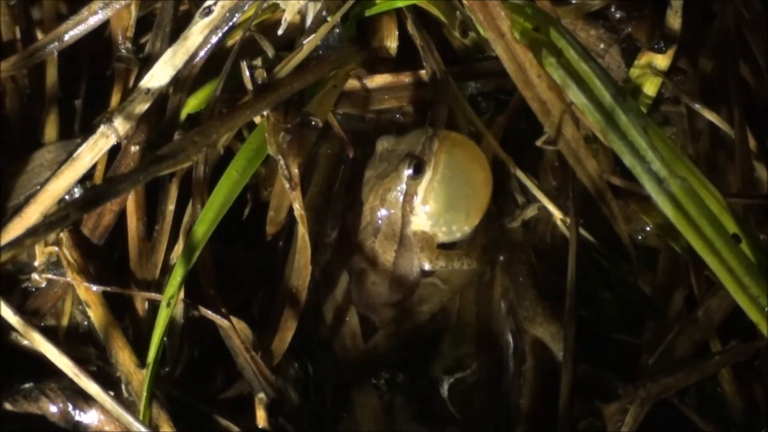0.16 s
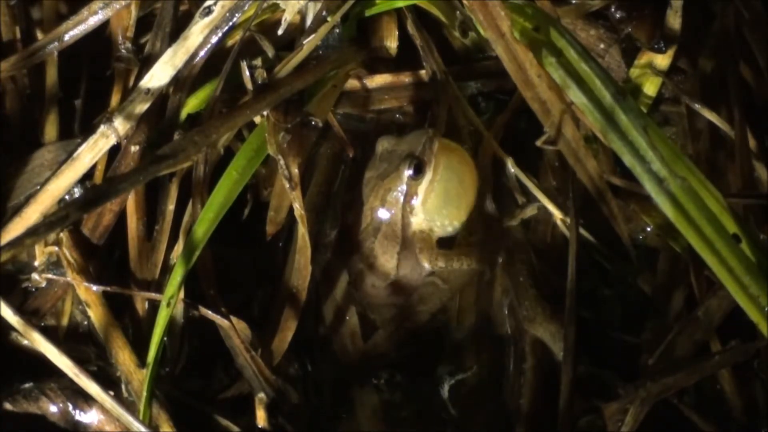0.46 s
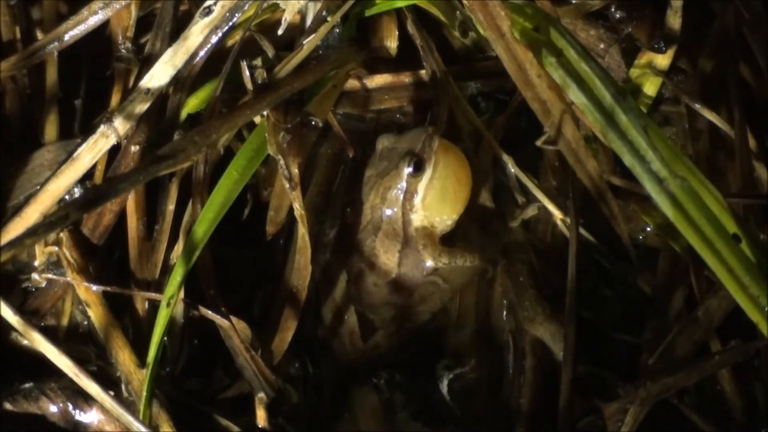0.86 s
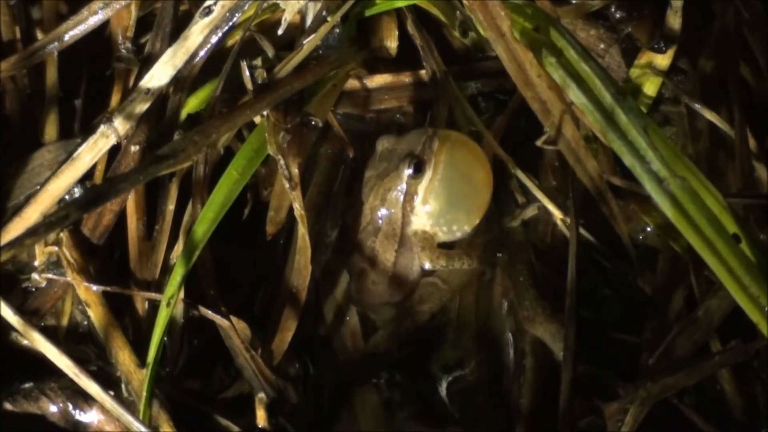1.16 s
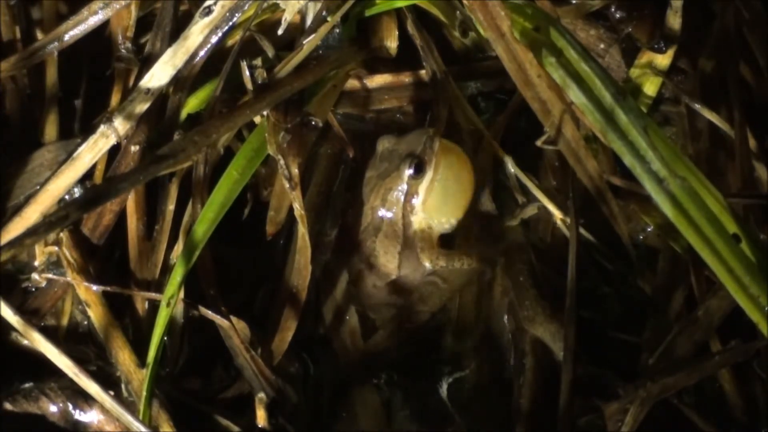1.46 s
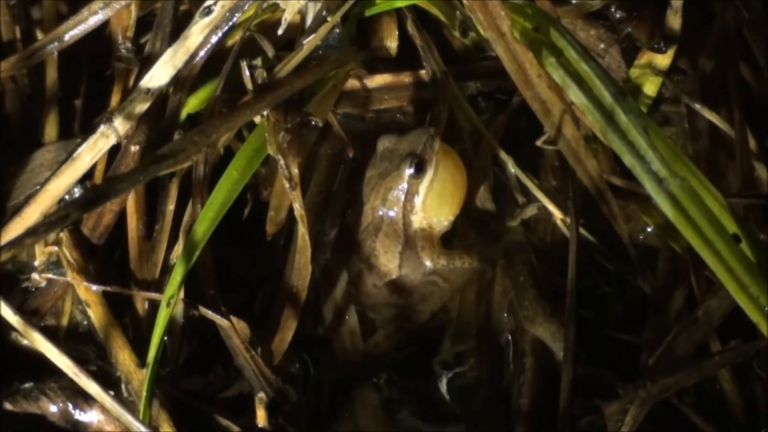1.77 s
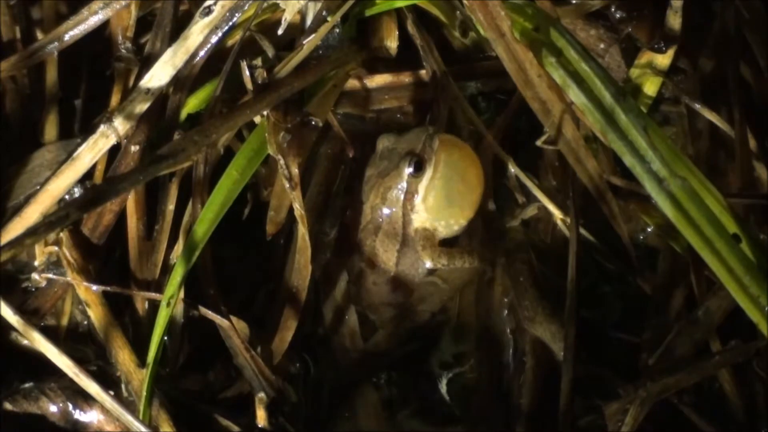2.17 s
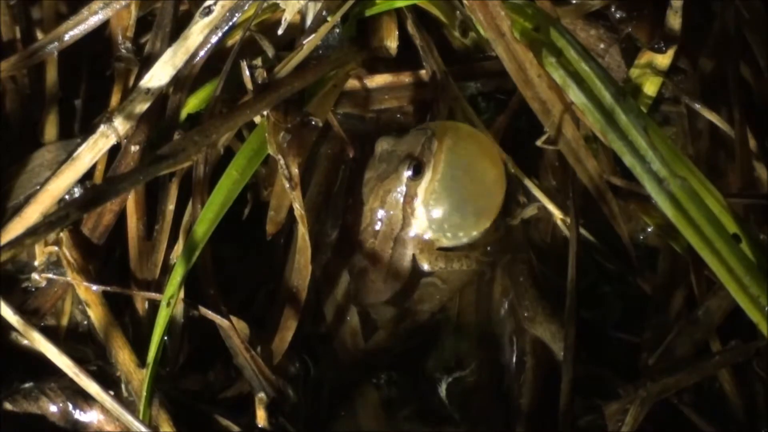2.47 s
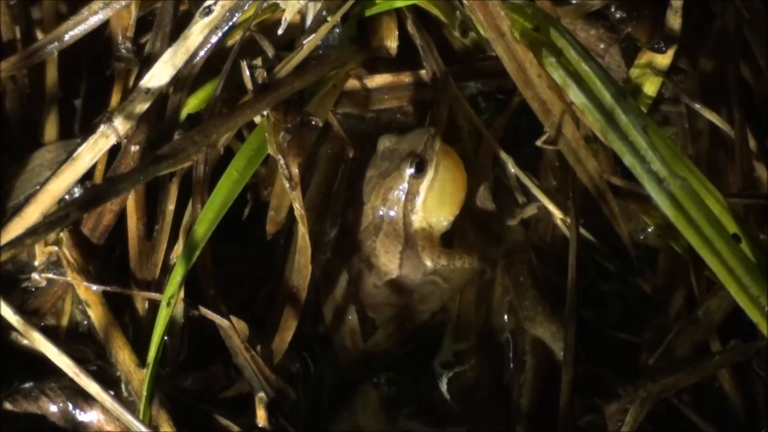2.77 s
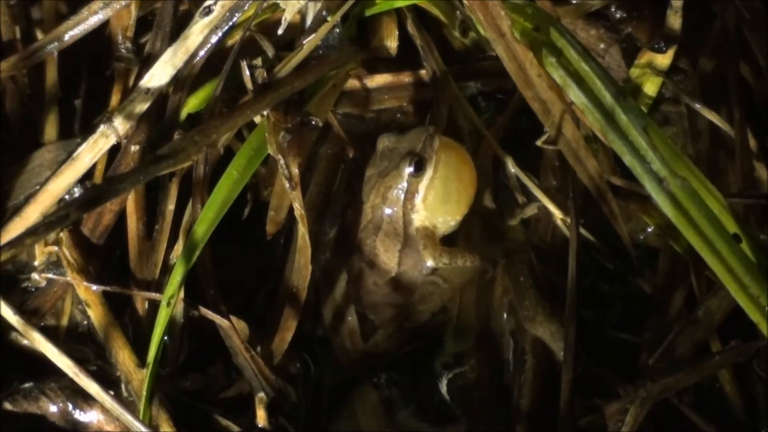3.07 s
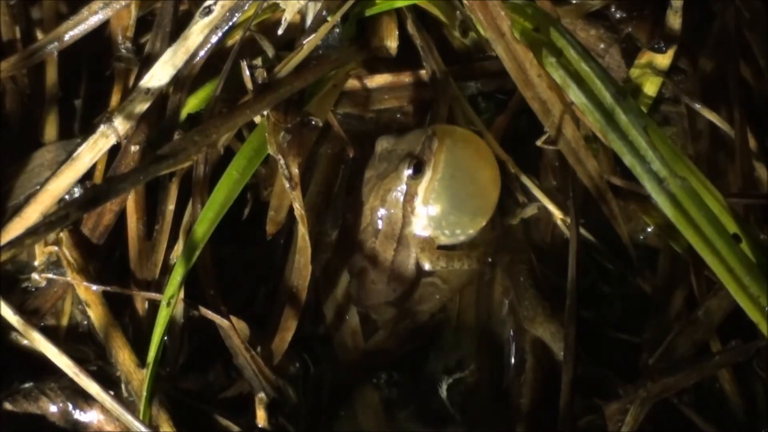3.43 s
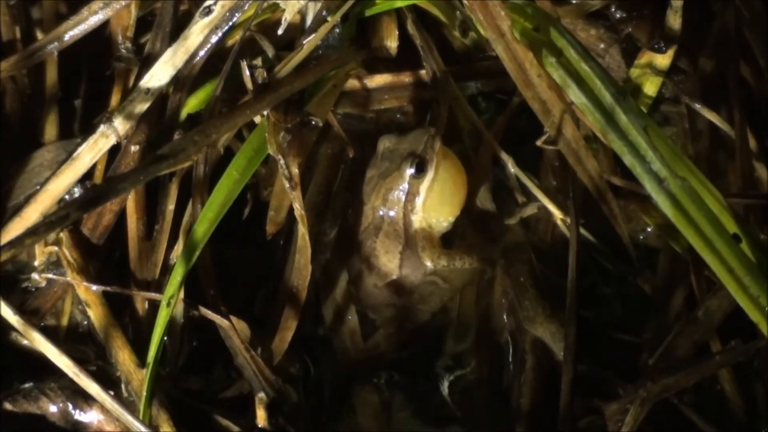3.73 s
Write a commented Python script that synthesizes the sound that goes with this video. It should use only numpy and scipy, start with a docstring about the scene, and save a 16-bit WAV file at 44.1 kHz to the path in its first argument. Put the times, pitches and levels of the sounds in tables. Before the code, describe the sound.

A frog creaks four loud, rasping trills close by, at about 0 to 0.4 seconds, 0.9 to 1.4, 2.1 to 2.5 and 3.1 to 3.6. Each is a run of sharp pulses that rises in pitch, slows slightly and ends in dry clicks. Throughout, other frogs peep high, upward whistles with a light echo over a faint low rush. Everything gets gradually quieter after 2.5 seconds.

```python
"""A chorus frog creaks four trills close by, at the edge of a pond at night.
Each pulse is a few snaps of its vocal folds ringing the throat sac; the pitch climbs through a
trill, which ends in quick dry clicks. Peepers whistle upward all around over a low rush.
A limiter ducks them at every pulse."""
import sys
import numpy as np
from scipy import signal
from scipy.fft import rfft, irfft
from scipy.io import wavfile
from scipy.ndimage import uniform_filter1d, minimum_filter1d

SR = 44100
rng = np.random.default_rng(int(sys.argv[2]) if len(sys.argv) > 2 else 0)


def store_wav(level_fs):
    """Save 16-bit WAV to argv[1]."""
    pcm = np.round(np.clip(np.atleast_2d(level_fs), -1, 1) * 32767)
    wavfile.write(sys.argv[1], SR, pcm.T.astype(np.int16))


N = 171990
BAND_EDGE_HZ = 15900


def amp(db):
    """Decibels to gain."""
    return 10 ** (np.asarray(db) / 20)


def at_hz(table, hz):
    """A frequency table at hz, on a log axis."""
    table_hz, values = np.transpose(table)
    return np.interp(np.log(hz + 1), np.log(table_hz), values)


def at_time(table, t):
    """Every column of a time table at t."""
    times, *columns = np.transpose(table)
    return [np.interp(t, times, column) for column in columns]


def add(mix, start_s, sound):
    """Mixes a sound in at start_s."""
    at = round(start_s * SR)
    sound = sound[max(-at, 0):]
    part = mix[max(at, 0):][:len(sound)]
    part += sound[:len(part)]


def pan(db):
    """Gains for a left-minus-right level."""
    return amp([[db / 2], [-db / 2]])


def drift(count, window):
    """Slow random wander of unit spread."""
    return uniform_filter1d(rng.standard_normal(count), window, mode="wrap") * np.sqrt(window)


# air spectrum (frequency [Hz], relative density [dB])
AIR_SPECTRUM = [(20, -15.5), (50, 0.5), (90, 2), (200, 2.5), (330, -4), (600, -13), (900, -15), (1250, -27),
                (1750, -10.5), (2200, -22), (4000, -23.5), (6500, -29.5), (10000, -33.5), (16000, -35.5)]
# left-right likeness (frequency [Hz], correlation [ratio])
AIR_CORRELATION = [(60, 1), (250, 1), (1000, 0.8), (16000, .94)]


def night_air(level_db=-38, wander_db=0.23):
    """A low, steady rush with faint hiss above it."""
    hz = np.fft.rfftfreq(N, 1 / SR)
    left, independent = rfft(rng.standard_normal((2, N))) * amp(at_hz(AIR_SPECTRUM, hz))
    correlation = at_hz(AIR_CORRELATION, hz)
    right = correlation * left + np.sqrt(1 - correlation ** 2) * independent
    air = irfft(np.array([left, right]), N)
    return amp(level_db + wander_db * drift(N, window=6000)) * air / air.std()


# swell of the far rush (time [s], level [dB])
RUSH_LEVEL = [(0, -46.5), (.7, -44.5), (1.3, -41.5), (1.8, -39.5), (2.3, -38.5), (2.8, -44.5), (3.3, -41),
              (3.9, -38.5)]


def far_rush(centre_hz=732, sigma_octaves=0.65):
    """A soft, faraway midrange rush that slowly swells and sinks."""
    hz = np.fft.rfftfreq(N, 1 / SR) + 1
    band = np.exp(-.5 * (np.log2(hz / centre_hz) / sigma_octaves) ** 2)
    noise = irfft(rfft(rng.standard_normal(N)) * band, N)
    return amp(at_time(RUSH_LEVEL, np.arange(N) / SR)[0]) * noise / noise.std()


# harmonics of a peeper's folds; the second is the whistle (relative level [dB])
PEEP_HARMONICS_DB = [-36.5, 0, -32.5, -42.5, -50, -62.5]


def peep(length_s, start_hz, end_hz, levels_db, rise_s=.014, fall_s=.024, spread_db=1.5, flutter_db=3):
    """A nearly pure whistle that glides up and flattens a little; its faint partials flutter."""
    t = np.arange(0, length_s + fall_s / 2, 1 / SR)
    progress = t / length_s
    waver, *flutters = [drift(SR // 2, window=500)[:len(t)] for _ in range(len(PEEP_HARMONICS_DB) + 1)]
    glide = progress + .25 * progress * (1 - progress)
    whistle_hz = (start_hz + (end_hz - start_hz) * glide) * (1 + .0025 * waver)
    fold_phase = np.pi * np.cumsum(whistle_hz) / SR  # an octave below the whistle
    ramp = np.clip(np.minimum(t / rise_s, (t[-1] - t) / fall_s), 0, 1)
    level_points = (np.arange(len(levels_db)) + .5) / len(levels_db)
    envelope = np.sin(np.pi / 2 * ramp) ** 2 * amp(np.interp(progress, level_points, levels_db))
    tone = np.zeros(len(t))
    for harmonic, (db, flutter) in enumerate(zip(PEEP_HARMONICS_DB, flutters), start=1):
        vary_db = (harmonic != 2) * (spread_db * rng.standard_normal() + flutter_db * flutter)
        tone += amp(db + vary_db) * np.sin(harmonic * fold_phase)
    return envelope * tone


# near peeps (time [s], length [s], start [Hz], end [Hz], early [dB], middle [dB], late [dB])
NEAR_PEEPS = [(0, 0.071, 2988, 3157, -4.5, -18.5, -20), (0.054, 0.14, 2770, 2997, -14.5, -21.5, -11.5),
              (0.114, 0.16, 2450, 2810, -22.5, -14, -24), (0.217, 0.11, 2922, 3050, -13, -32, -30),
              (0.303, 0.1, 2876, 3160, -23, -22.5, -15), (0.39, 0.098, 2825, 2988, -9.5, -17, -12),
              (0.444, 0.19, 2647, 3175, -17.5, -17.5, -22.5), (0.633, 0.15, 2763, 3070, -13, -30.5, -11.5),
              (0.68, 0.1, 2665, 2940, -24.5, -10.5, -20), (0.856, 0.14, 2944, 3203, -13.5, -11.5, -12),
              (0.897, 0.16, 2437, 2840, -22, -17.5, -9.5), (0.917, 0.093, 2770, 2990, -18, -11.5, -24.5),
              (1.049, 0.14, 2838, 3140, -32, -14, -15.5), (1.257, 0.1569, 2780, 3050, -17, -20.5, -13.5),
              (1.501, 0.11, 2817, 3021, -12, -19.5, -18.5), (1.599, 0.11, 3030, 3228, -18.5, -20, -13),
              (1.635, 0.1645, 2785, 3142, -17, -12.5, -23), (1.675, 0.085, 2674, 2922, -15.5, -14.5, -20.5),
              (1.795, 0.11, 2788, 2942, -12, -19, -20.5), (1.91, 0.13, 2826, 3043, -12.5, -21.0, -26),
              (1.851, 0.12, 2478, 2710, -26, -16.0, -20.0), (2.056, 0.13, 2806, 3140, -10, -10, -16),
              (2.295, 0.15, 2888, 3236, -13, -14, -19.5), (2.333, 0.15, 2670, 2960, -17.5, -14, -23.5),
              (2.525, 0.1363, 2730, 3003, -16, -21.5, -19), (2.54, 0.087, 2780, 2835, -30, -19.5, -19),
              (2.685, 0.175, 2825, 3195, -12, -22, -24), (2.81, 0.094, 2931, 3093, -11.5, -14.5, -14.5),
              (2.91, 0.082, 2650, 2883, -21, -15.5, -13), (3, 0.1, 2764, 3096, -12, -21, -25),
              (3.03, 0.14, 2913, 3260, -15.0, -19, -16), (3.084, 0.1046, 2500, 2696, -24, -18.0, -16),
              (3.112, 0.089, 2880, 3087, -18, -8.5, -21.0), (3.247, 0.22, 2804, 3096, -12.5, -31, -47.5),
              (3.3, 0.09, 2715, 2880, -18.5, -18, -28.5), (3.419, 0.11, 2900, 3100, -14, -16, -14.5),
              (3.47, 0.13, 2800, 2947, -15.5, -10.5, -25.5), (3.653, 0.15, 2928, 3224, -10.5, -16.5, -14),
              (3.857, 0.13, 2785, 3050, -9, -17, -17)]


def near_peepers(gain_db=0.5, pan_db=-2.5, pan_spread_db=3.5, echo_db=-10.5):
    """The peeps that stand out, each from its own direction, with their echoes."""
    out = np.zeros((2, N))
    sides = rng.uniform(-1.1, 1, len(NEAR_PEEPS))
    for (start_s, length_s, start_hz, end_hz, *levels_db), side in zip(NEAR_PEEPS, sides):
        whistle = amp(gain_db) * peep(length_s, start_hz, end_hz, levels_db)
        for channel, gain in zip(out, pan(pan_db + pan_spread_db * side)):
            add(channel, start_s, gain * whistle)
    return out + amp(echo_db) * pond_echo(out.mean(0))


def far_peepers(peeps_per_s=29, level_db=-35.5, start_hz=2790, glide_hz=266.8, length_s=0.14):
    """Many distant peeps, heard only through their echoes."""
    out = np.zeros(N)
    count = int(peeps_per_s * N / SR)
    for k, (timing, pitch, loudness) in enumerate(rng.uniform(-1, 1, (count, 3))):
        hz = start_hz + 90 * pitch
        whistle = peep(length_s, hz, hz + glide_hz, [level_db + 4 * loudness])
        add(out, (k + timing - 1) / peeps_per_s, whistle)
    return pond_echo(out)


# echo decay over the pond (frequency [Hz], T60 [s])
POND_DECAY = [(200, 0.66), (1500, 1), (3000, 0.47), (6000, 0.21), (14000, 0.35)]


def pond_echo(sound, onset_s=0.00667, side_db=-10.5):
    """Scattered echoes from reeds and banks, different in each channel."""
    hz, t, noise = signal.stft(rng.standard_normal((2, SR)), SR, nperseg=256)
    envelope = amp(-60 * t / at_hz(POND_DECAY, hz)[:, None]) * np.minimum(t / onset_s, 1)
    mid, side = signal.istft(noise * envelope, SR, nperseg=256)[1]
    tail = mid + np.array([[1], [-1]]) * amp(side_db) * side
    return signal.fftconvolve(sound[None], tail / np.linalg.norm(tail[0]), axes=1)[:, :N]


# trill starts (time [s])
TRILL_STARTS_S = [-.055, .912, 2.067, 3.077]
# pulses of the trills (time [s], relative peak [dB])
FROG_PULSES = [(0.011, -6), (0.0337, -4.5), (0.0559, -8), (0.0772, 2), (0.0994, 6), (0.1248, -2),
               (0.1514, 3), (0.1797, 3.5), (0.21, 4.5), (0.2437, 3.5), (0.2815, 4.5), (0.321, 3.5),
               (0.3628, 4), (0.3962, -3), (0.4013, -8.5), (0.9129, -11.5), (0.9348, -7), (0.9588, -11),
               (0.9829, -1.5), (1.0059, -4), (1.0296, 3), (1.0534, -2), (1.0765, -0.5), (1.1024, 1),
               (1.1289, 1.5), (1.1607, 1.5), (1.1936, 1), (1.2289, 2), (1.2695, 4), (1.3109, 3),
               (1.3555, -1), (1.3639, -2.5), (1.3744, -6.5), (2.0688, -11), (2.0902, -8.5), (2.1129, -5.5),
               (2.1354, -13.5), (2.158, -5.5), (2.1802, 0.5), (2.2026, -5.5), (2.2259, 2), (2.2503, 0.0),
               (2.2771, 0.0), (2.306, 3.5), (2.3379, 3.5), (2.3732, 2.5), (2.4129, 3.5), (2.4543, 1),
               (2.499, 3.5), (2.5211, 0), (2.5281, -8), (3.079, -6), (3.1001, -14), (3.123, -4.5),
               (3.147, -2.5), (3.1682, 2.5), (3.1922, -5), (3.2154, 1), (3.238, 1), (3.2628, 1.5),
               (3.2896, 0.0), (3.3186, 4), (3.35, 2), (3.386, 1), (3.424, 5), (3.4644, 2), (3.5086, 3.5),
               (3.5447, -1.5), (3.5502, -16)]
# throat sac resonance (time in trill [s], centre [Hz], bandwidth [Hz])
SAC_RESONANCE = [(0, 3090, 360), (.03, 3230, 215), (.08, 3320, 170), (.14, 3400, 150), (.27, 3540, 150),
                 (.39, 3640, 175), (.44, 3670, 290), (.47, 3680, 360)]
# snap rate of the folds (time in trill [s], rate [Hz])
FOLD_RATE = [(0, 1490), (.03, 1570), (.1, 1635), (.2, 1700), (.35, 1775), (.47, 1800)]
# successive snaps in a pulse (gain [ratio])
SNAP_GAINS = [1, 0.78, 0.57, 0.093]
# spectrum of one snap (frequency [Hz], level [dB])
SNAP_SPECTRUM = [(200, -16), (850, -6.5), (1120, 13.5), (1400, 8), (1800, 10.5), (2400, -1), (3500, 5),
                 (4200, 2), (4700, 2.5), (5050, -6), (5400, 2), (5900, -4), (6450, -2.5), (6800, -19.5),
                 (7150, -2.5), (7800, -15.5), (8800, -1), (9500, -14), (10300, -11), (11300, -16.5),
                 (12800, -17), (13900, -5), (15000, -23.5), (16000, -25.5)]


def chorus_frog(gain_db=16.5, pan_db=-0.16, smear_s=0.00045, jitter_periods=.012, fft_size=4096):
    """Each pulse: a few snaps of the folds ring the sac, which tightens as the trill goes on."""
    out = np.zeros(N)
    hz = np.fft.rfftfreq(fft_size, 1 / SR) + 1e-3
    log_gain = np.log(amp(at_hz(SNAP_SPECTRUM, abs(np.fft.fftfreq(fft_size, 1 / SR)))))
    snap = np.exp(np.conj(signal.hilbert(log_gain)))[:len(hz)]  # minimum phase
    snap *= np.exp(-1j * np.pi * smear_s * hz ** 2 / BAND_EDGE_HZ)  # band edge lags the bass by smear_s
    for start_s, db in FROG_PULSES:
        *jitter, detune = rng.standard_normal(len(SNAP_GAINS) + 1)
        age_s = start_s - max(t for t in TRILL_STARTS_S if t <= start_s + .01)
        fold_hz, = at_time(FOLD_RATE, age_s)
        delays_s = [(k + jitter_periods * slip) / fold_hz for k, slip in enumerate(jitter)]
        train = sum(gain * np.exp(-2j * np.pi * hz * s) for gain, s in zip(SNAP_GAINS, delays_s))
        sac_hz, bandwidth_hz = at_time(SAC_RESONANCE, age_s)
        sac_hz *= 1 + 0.0018 * detune
        sac = 1 / (1 + 1j * sac_hz / bandwidth_hz * (hz / sac_hz - sac_hz / hz))
        pulse = irfft(train * snap * sac)[:fft_size // 2]
        add(out, start_s, amp(gain_db + db) * pulse / abs(pulse).max())
    return out * pan(pan_db) + reed_scatter(out)


# colour of the frog's sound off the reeds (frequency [Hz], gain [dB])
REED_SPECTRUM = [(500, -3.5), (1800, 0.5), (3500, 0), (4500, 14.5), (5400, 11), (7200, 13.5), (9000, 10),
                 (14000, 2)]


def reed_scatter(frog, reeds_db=-18, decay_s=0.004, echo_db=-36.5):
    """The frog's sound thrown back: a short, bright scatter from the reeds, then the pond."""
    colour = amp(at_hz(REED_SPECTRUM, np.fft.rfftfreq(2 * N, 1 / SR)))
    bright = irfft(rfft(frog, 2 * N) * colour)[:N]
    t = np.arange(SR // 10) / SR
    taps = rng.standard_normal((2, len(t))) * np.exp(-t / decay_s)
    reeds = signal.fftconvolve(bright[None], taps / np.linalg.norm(taps[0]), axes=1)[:, :N]
    return amp(reeds_db) * reeds + amp(echo_db) * pond_echo(bright)


def scene():
    """The near frog, the peepers, the air and the far rush."""
    return chorus_frog() + near_peepers() + far_peepers() + night_air() + far_rush()


# overall level after the limiter (time [s], gain [dB])
OUTPUT_GAIN = [(0, -1), (2.5, -0.5), (2.8, -3), (3.1, -3.5), (3.55, -5.5), (3.9, -10)]


def record(dry, ceiling_db=-2, recovery_s=0.035, look_ahead_s=0.0024):
    """A fast look-ahead limiter, an overall level that eases down, and a low-pass."""
    t = np.arange(N) / SR
    ahead = int(look_ahead_s * SR)
    safe_gain = np.minimum(amp(ceiling_db) / (abs(dry).max(0) + 1e-9), 1)
    cut = 1 - minimum_filter1d(safe_gain, 2 * ahead)
    release = t / recovery_s
    cut = np.exp(np.maximum.accumulate(np.log(cut + 1e-9) + release) - release)  # exponential recovery
    limited = dry * (1 - uniform_filter1d(cut, ahead))
    faded = limited * amp(at_time(OUTPUT_GAIN, t)[0])
    low_pass = signal.firwin(301, BAND_EDGE_HZ, window=("kaiser", 8), fs=SR)
    return signal.oaconvolve(faded, low_pass[None], "same")


dry = scene()
out = record(dry)
store_wav(out)
```